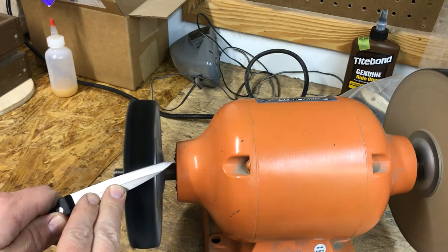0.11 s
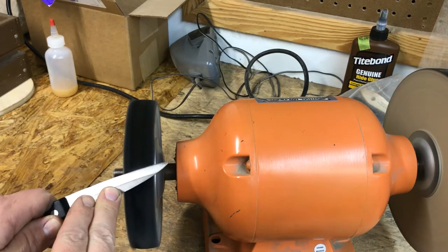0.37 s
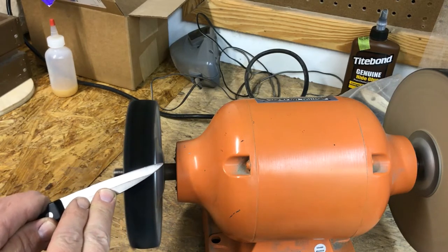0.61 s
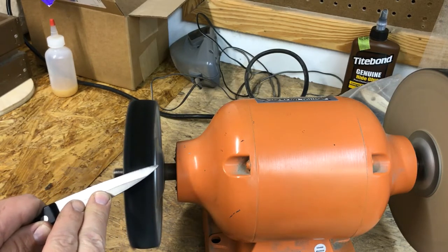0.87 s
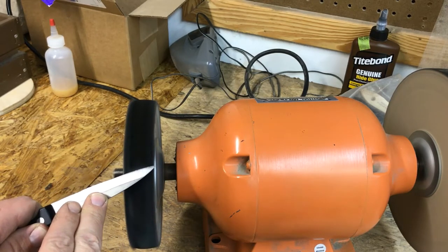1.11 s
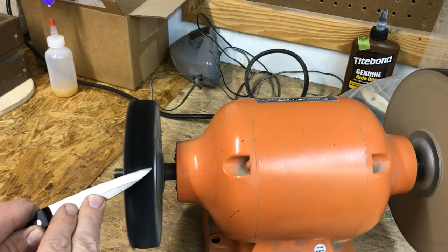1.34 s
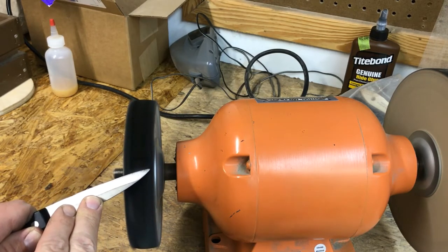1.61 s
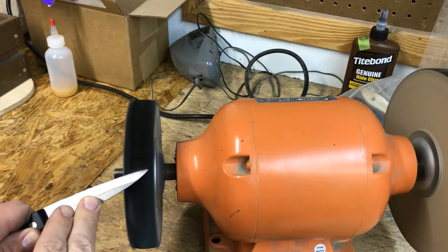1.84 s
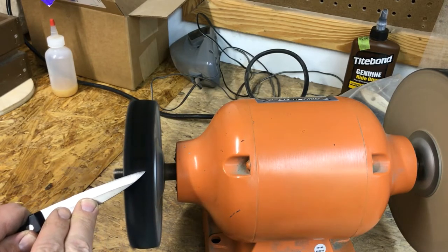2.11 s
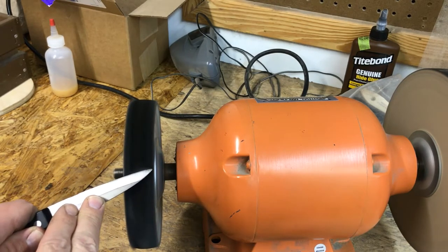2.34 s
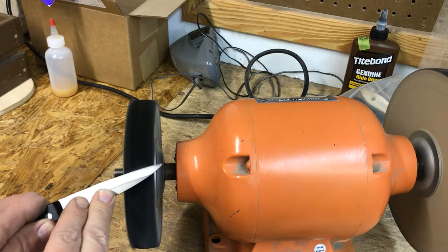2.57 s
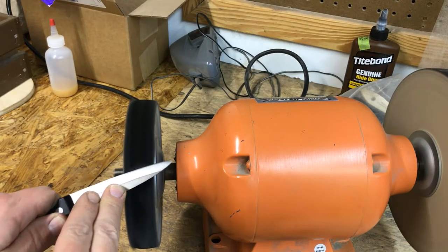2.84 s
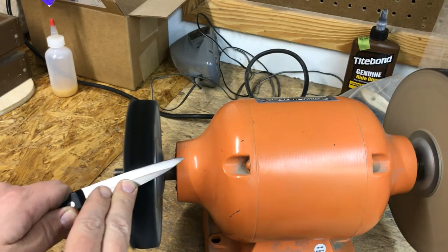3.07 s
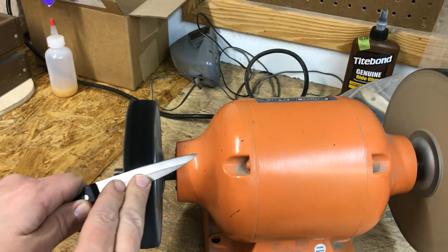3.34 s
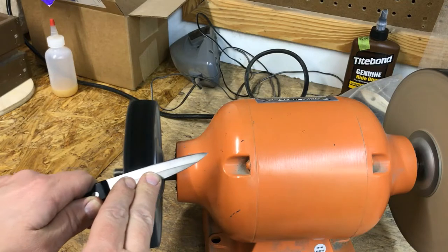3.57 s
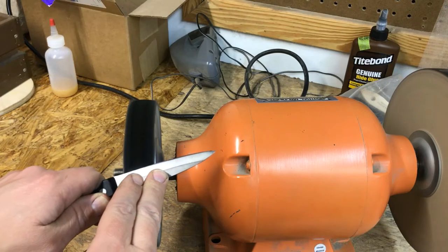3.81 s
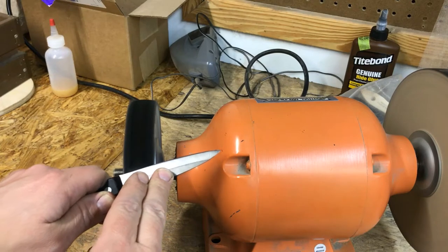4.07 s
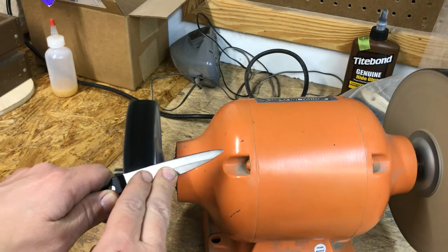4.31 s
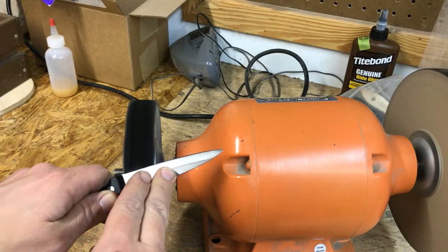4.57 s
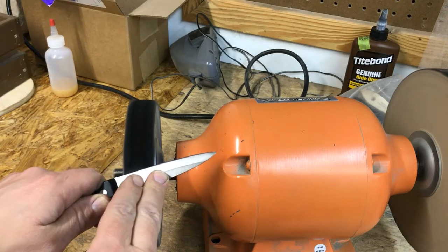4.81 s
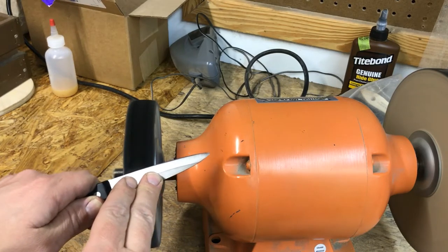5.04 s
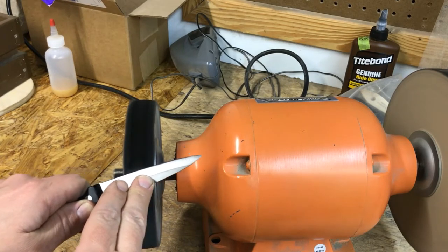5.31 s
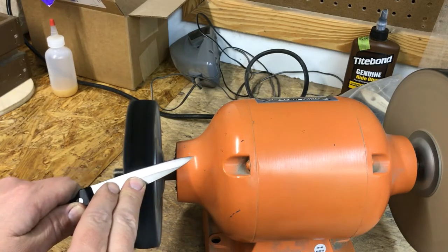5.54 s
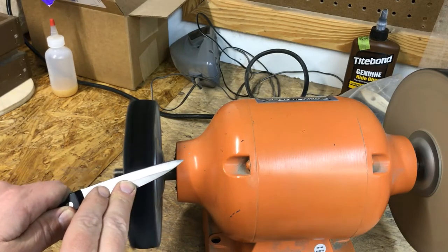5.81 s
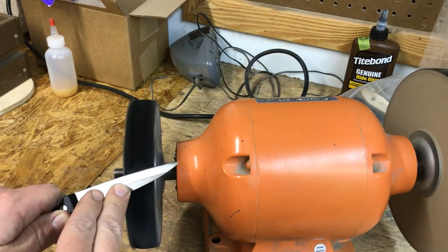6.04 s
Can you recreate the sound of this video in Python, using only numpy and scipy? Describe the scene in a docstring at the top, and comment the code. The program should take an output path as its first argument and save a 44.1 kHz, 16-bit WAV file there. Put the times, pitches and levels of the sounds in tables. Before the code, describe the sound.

A bench grinder runs without pause, its electric motor giving a steady low mains hum. A knife edge rubs the spinning buffing wheel in a continuous bright, buzzy hiss that repeats rapidly with each turn. The tone shifts as contact moves from belly to tip, whines briefly under pressure, then grows stronger towards the heel. Close, dry, almost mono workshop sound.

```python
"""On a wooden bench a grinder runs while a knife edge is drawn across its buffing wheel.
The wheel's surface passes the blade once a turn, so the rub nearly repeats: a hiss made of shaft orders.
The motor hums on twice the mains frequency, with tones of the shaft and sums of both.
Loose fibres and stirred air add plain noise. Almost mono: only a faint low-mid noise differs left to right."""
import sys
import numpy as np
from scipy import signal
from scipy.fft import rfft, irfft
from scipy.io import wavfile
from scipy.ndimage import uniform_filter1d, map_coordinates

SR = 44100
rng = np.random.default_rng(int(sys.argv[2]) if len(sys.argv) > 2 else 0)


def store_wav(level_fs):
    """Save 16-bit WAV to argv[1]."""
    pcm = np.round(np.clip(np.atleast_2d(level_fs), -1, 1) * 32767)
    wavfile.write(sys.argv[1], SR, pcm.T.astype(np.int16))


def gain_from_db(level_db):
    """Turn a decibel level (scalar or array-like) into a linear amplitude factor."""
    decades = np.asarray(level_db, float) / 20
    return 10 ** decades


N = 271730
MAINS_HZ = 60.01
# shaft speed, sagging under the blade: (time [s], speed [turns/s])
SHAFT_SPEED = [(0, 58.58), (.9, 58.66), (2.2, 58.9), (2.5, 58.85), (3.15, 58.675), (3.5, 58.663),
               (4.3, 58.695), (4.6, 58.635), (4.85, 58.48), (5.4, 58.37), (6.16, 58.47)]
MEAN_SHAFT_HZ = np.mean(SHAFT_SPEED, 0)[1]  # plain mean of the listed speeds


def read(hz, f, value):
    """A spectrum joined by straight lines on a log-frequency axis."""
    return np.interp(np.log(hz + 1), np.log(np.asarray(f) + 1), value)


def drift(steps, span, count):
    """Complex slow chance of mean power 1, one column a tone, changing over span steps."""
    settle = 400  # steps run in and thrown away
    z = rng.standard_normal((steps + settle, count, 2)) @ [1, 1j]
    r = np.exp(-1 / max(span, 1))
    z = signal.lfilter([1], [1, -2 * r, r * r], z, axis=0)[settle:]
    return z * np.sqrt((1 - r * r) ** 3 / (1 + r * r) / 2)


def bell(hz, centre_hz, width_hz):
    """A Gaussian band of height 1, width_hz across where it has fallen to 1/e."""
    return np.exp(-(2 * (hz - centre_hz) / width_hz) ** 2)


def shaft_turns():
    """Turns of the shaft so far at each sample: the running sum of its speed."""
    speed_hz = np.interp(np.arange(N) / SR, *np.transpose(SHAFT_SPEED))
    return np.cumsum(speed_hz) / SR


def stroke(t):
    """Pressure [dB] from motor slip and push; reach along the blade; push on the tip (0-1), at times t."""
    # the hand eases the blade from one resting place to the next:
    # (time [s], reach along the blade [0 tip, 1 belly, 2 heel])
    rests = [(-.6, 0.87), (1, .1), (2.4, 0.16), (4.3, 1.92), (4.45, 1.98), (5.8, 0.9), (6.4, 0.52)]
    load_share, push_db = 0.49, 1.1  # how far the level follows the slip; gain at full push
    push_start_s, push_end_s, release_s = 1.4, 2.22, 0.12

    rest_s, rest_reach = np.transpose(rests)
    leg_numbers = np.arange(len(rest_s))
    leg = np.interp(t, rest_s, leg_numbers)
    eased_leg = leg // 1 + (1 - np.cos(np.pi * (leg % 1))) / 2
    reach = np.interp(eased_leg, leg_numbers, rest_reach)

    # the tip is pressed in ever harder, then eased off
    push = np.interp(t, [push_start_s, push_end_s, push_end_s + release_s], [0, 1, 0])
    slip_hz = MAINS_HZ - np.interp(t, *np.transpose(SHAFT_SPEED))
    load_db = 20 * np.log10(slip_hz / (MAINS_HZ - MEAN_SHAFT_HZ))
    return load_share * load_db + push_db * push, np.clip(reach, 0, 2), push


def along_blade(reach, tip, belly, heel):
    """Blends values for the three places on the blade by straight lines."""
    return tip + np.minimum(reach, 1) * (belly - tip) + np.maximum(reach - 1, 0) * (heel - belly)


def dips_db(hz):
    """Narrow dips in the treble [dB], probably cancellation by the echo off the bench."""
    # dips: (centre [Hz], width [Hz], gain [dB])
    dips = [(9050, 380, -5.5), (10280, 640, -7), (11750, 290, -4.5), (13700, 500, -2.5)]
    return sum(db * bell(hz, f, width_hz) for f, width_hz, db in dips)


def high_spots(turns, sharp=33.0, second=1.0, bump_db=1.8):
    """Two high spots on opposite sides of the rim press harder on the blade for a moment."""
    spin = np.cos(2 * np.pi * turns)
    bump = np.exp(sharp * (spin - 1)) + second * np.exp(sharp * (-spin - 1))
    return gain_from_db(bump_db * (bump - bump.mean()))


def rub_level_db(order, hz, reach, push, ridges, count, band_db=3.0, band_span=22.0):
    """Level [dB] of each shaft order of the rub in each turn: place on the blade, ridges, band drift and whine."""
    # one shaft order between the ridges: (frequency [Hz], tip level [dB], belly level [dB], heel level [dB])
    rub = [(760, -61.5, -65, -68), (1390, -59, -60, -57), (1950, -55, -50, -58.5), (2730, -52, -52, -49.5),
           (3530, -52.5, -53, -43.5), (4650, -47.5, -46.5, -43), (5470, -51.5, -45, -41.5),
           (6450, -50, -48.5, -48.5), (7730, -51.5, -48, -64), (8360, -54, -46, -51.5),
           (10100, -50, -56.5, -56), (11100, -50.5, -53, -54.5), (12200, -53.5, -53.5, -54.5),
           (15500, -58.5, -59, -60)]
    # levels of the ridge orders: (tip level [dB], heel level [dB])
    ridge_db = [(-52.5, -48.0), (-45.5, -49.0), (-49.0, -42.5), (-53.0, -43.0), (-51.5, -45.0),
                (-45.5, -50.5), (-51.5, -42.5), (-50.5, -49.5), (-53.0, -40.5), (-44.5, -48.0),
                (-44.0, -45.5), (-47.5, -44.0), (-44.5, -45.5), (-45.5, -43.5), (-42.5, -40.5),
                (-42.5, -41.0), (-47.0, -36.0), (-44.5, -50.5), (-50.5, -40.0), (-47.0, -48.5),
                (-49.5, -41.0), (-54.0, -39.0), (-54.0, -39.5), (-42.0, -41.0), (-45.5, -44.0),
                (-41.5, -54.5), (-44.0, -41.5), (-52.5, -36.0), (-54.0, -44.0), (-52.0, -43.5),
                (-45.5, -53.0), (-45.0, -46.5), (-45.5, -48.0), (-44.5, -52.0), (-50.5, -45.5)]
    # ridge orders that stand out most under the belly: (multiple of the shaft speed)
    belly_orders = [92, 95, 103, 104, 143]
    belly_db = 4
    whine_hz, whine_width_hz, whine_db = 5650, 760, 4.5  # the pressed tip whines

    rub_hz, *zones = np.transpose(rub)
    level_db = along_blade(reach, *(read(hz, rub_hz, db) for db in zones))
    # bands of neighbouring orders swell and fade slowly at random, the more the higher they lie
    bands = uniform_filter1d(drift(count, band_span, len(order)).real, size=4, axis=1)
    level_db += band_db * bands / bands.std() * order / len(order)
    tip_db, heel_db = np.transpose(ridge_db)
    level_db[:, ridges] = tip_db + (heel_db - tip_db) * np.sin(reach * np.pi / 4)
    level_db[:, belly_orders] += belly_db * (1 - 2 * abs(reach - 1))
    return level_db + whine_db * push * bell(hz, whine_hz, whine_width_hz)


def wheel(turns, fresh=0.38, fresh_top=0.6, ridge_fresh=0.07, span=30.0, wobble=0.0005, cap=1.45):
    """One turn of rub is built from its orders; the blade reads it over and over while it slowly changes."""
    # orders that the wheel's unevenness favours: (multiple of the shaft speed)
    ridges = [29, 33, 37, 38, 45, 46, 50, 53, 56, 58, 64, 65, 67, 68, 71, 72, 76, 77, 78, 80, 83, 86, 87,
              92, 93, 94, 95, 98, 103, 104, 119, 123, 126, 127, 143]
    count, size = int(turns[-1]) + 2, 8192  # turns; points round the rim
    order = np.arange(275)
    hz = order * MEAN_SHAFT_HZ
    turn_s = np.interp(np.arange(count), turns, np.arange(N) / SR)
    pressure_db, reach, push = stroke(turn_s[:, None])
    level_db = rub_level_db(order, hz, reach, push, ridges, count)

    # tip and heel ride on different tracks of the wheel, each with a lasting pattern
    tracks = rng.standard_normal((2, len(order), 2)) @ [1, 1j] / np.sqrt(2)
    tracks *= np.minimum(1, cap / abs(tracks))  # no chance order outgrows the ridges
    tracks[:, ridges] = tracks[0, ridges] / abs(tracks[0, ridges])
    lasting = np.cos(reach * np.pi / 4) * tracks[0] + np.sin(reach * np.pi / 4) * tracks[1]
    lasting[:, ridges] = tracks[0, ridges]

    # power share of slowly renewed texture: fine texture wears off sooner
    share = np.linspace(fresh, fresh_top, len(order))
    share[ridges] = ridge_fresh
    orders = np.sqrt(1 - share) * lasting + np.sqrt(share) * drift(count, span, len(order))
    orders *= gain_from_db(level_db + pressure_db + dips_db(hz)) * (order > 13)

    # the high spots swell the texture but not the ridges
    ridged = np.isin(order, ridges)
    texture = irfft(orders * ~ridged, size, axis=1) * high_spots(np.arange(size) / size)
    pattern = (texture + irfft(orders * ridged, size, axis=1)) * size / np.sqrt(2)

    # the hand trembles, so the contact point slides a little round the rim
    tremble = drift(count, 1.7, 1)[:, 0].real
    angle = turns + wobble * np.interp(turns, np.arange(count), tremble)
    pattern = np.column_stack([pattern, pattern[:, 0]])  # closes the rim
    return map_coordinates(pattern, [turns, angle % 1 * size], order=1)


def air(patchy_db=1.5, follow=0.36):
    """Fibre hiss and stirred air: random short-time spectra in drifting patches, ringing in the casing."""
    # noise that does not repeat: (frequency [Hz], density level [dB])
    noise_floor = [(20, -75), (90, -72.5), (260, -73), (600, -75.5), (850, -81.5), (1300, -76.5),
                   (2300, -74), (3000, -77), (4500, -71.5), (6400, -74), (8200, -74), (10000, -73),
                   (13000, -80.5), (15000, -87), (16000, -90)]
    # rings of the casing in that noise: (centre [Hz], width [Hz], density level [dB])
    casing = [(1876, 34, -70.5), (3610, 580, -69), (5710, 230, -68.5), (7020, 140, -64.5)]
    dull_hz, dull_width_hz, dull_db = 7800, 2200, -2.5  # past the belly the hiss loses this band
    size, hop = 1024, 256  # samples
    frames, hz = N // hop + 5, np.fft.rfftfreq(size, 1 / SR)

    real, imaginary, patches = rng.standard_normal((frames, len(hz), 3)).T
    patches = uniform_filter1d(uniform_filter1d(patches, size=14, axis=0), size=20, axis=1)
    power = gain_from_db(read(hz, *np.transpose(noise_floor))) ** 2
    for f, width_hz, db in casing:
        power += gain_from_db(db) ** 2 / (1 + (2 * (hz - f) / width_hz) ** 2) ** 2
    power *= gain_from_db(dips_db(hz)) ** 2

    pressure_db, reach, _ = stroke(np.arange(frames) * hop / SR)
    heel_db = dull_db * np.outer(bell(hz, dull_hz, dull_width_hz), np.maximum(reach - 1, 0))
    gain_db = patchy_db * patches / patches.std() + follow * pressure_db + heel_db
    spectra = (real + 1j * imaginary) * np.sqrt(power)[:, None] * gain_from_db(gain_db)
    return signal.istft(spectra, SR, nperseg=size, noverlap=size - hop, scaling="psd")[1][:N]


def motor(turns, span=4.8, lag=0.0594):
    """Magnetic hum and unbalance through the bench: tones locked in step, with a narrow noisy skirt."""
    # tones at a x mains + b x shaft: (a [multiple of mains], b [multiple of shaft speed])
    hum_orders = [(0, 1), (0, 2), (2, 0), (2, 1), (4, 0), (4, 1), (6, 0), (8, 0), (8, 1), (8, 2), (10, 0),
                  (0, 12), (12, 0), (0, 13), (14, 0), (6, 1), (0, 9), (10, 1)]
    # the same tones: (rms level before the waver [dB], waver [share of the tone])
    hum = [(-39.5, 0.12), (-60, .1), (-36, 0.073), (-66, 0.28), (-48, 0.41), (-57.5, 0.24), (-41.5, 0.073),
           (-44, 0.17), (-56, 0.23), (-48.5, 0.29), (-64.5, .2), (-61.5, 0.34), (-49.5, 1), (-61.5, 0.22),
           (-63.5, .2), (-65, .3), (-60, .3), (-61, .3)]
    t, out = np.arange(N) / SR, np.zeros(N)
    steps = np.arange(0, N + 256, 256) / SR
    wavers = drift(len(steps), span, len(hum)).T
    for (a, b), (db, share), waver in zip(hum_orders, hum, wavers):
        late = lag * (a + b) ** 2 / 4  # turns of phase: the bench passes higher tones on a little later
        size = 1 + share * np.interp(t, steps, waver)
        phase = a * MAINS_HZ * t + b * turns - late
        out += gain_from_db(db) * np.sqrt(2) * (size * np.exp(2j * np.pi * phase)).real
    return out


def width(closed=-0.4, span=0.06, level_db=-60.5):
    """A faint low-mid noise, opposite in left and right, flickers on and off; span [s], level_db rms."""
    # its colour: (frequency [Hz], relative level [dB])
    side_colour = [(71, -62), (120, -24), (249, -1.5), (533, -9), (718, -23), (1340, -36), (1400, -26),
                   (1820, -60), (3080, -120)]
    block = 1024  # samples
    colour = gain_from_db(read(np.fft.rfftfreq(N, 1 / SR), *np.transpose(side_colour)))
    noise = irfft(rfft(rng.standard_normal(N)) * colour, N)
    chance = drift(N // block + 1, span * SR / block, 1)[:, 0].real * np.sqrt(2)
    flicker = np.repeat(chance > closed, block)[:N]
    noise *= uniform_filter1d(flicker * 1., size=block)
    return gain_from_db(level_db) * noise / noise.std()


def scene():
    """All sources in the middle, with a trace of width."""
    turns = shaft_turns()
    mid = wheel(turns) + high_spots(turns) * air() + motor(turns)
    side = width()
    return np.array([mid + side, mid - side])


def top_cut(x):
    """Nothing passes above the cut-off."""
    return signal.sosfilt(signal.butter(12, 16950, fs=SR, output="sos"), x)


def record(dry):
    """A steep low-pass at 15.7 kHz limits the band of the finished mix."""
    low_pass = signal.firwin(1023, 15700, window=("kaiser", 9), fs=SR)
    limited = signal.oaconvolve(dry, low_pass[None], "same")
    return top_cut(limited)


dry = scene()
out = record(dry)
store_wav(out)
```